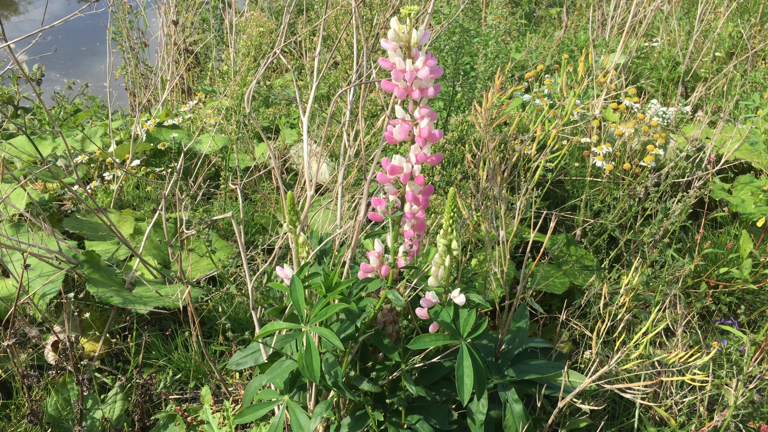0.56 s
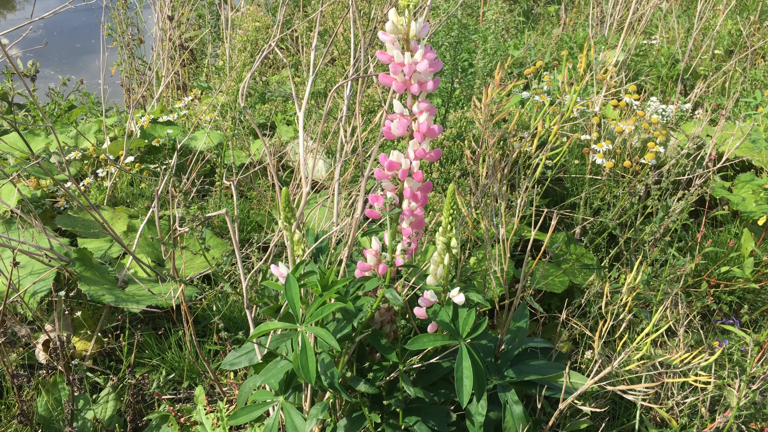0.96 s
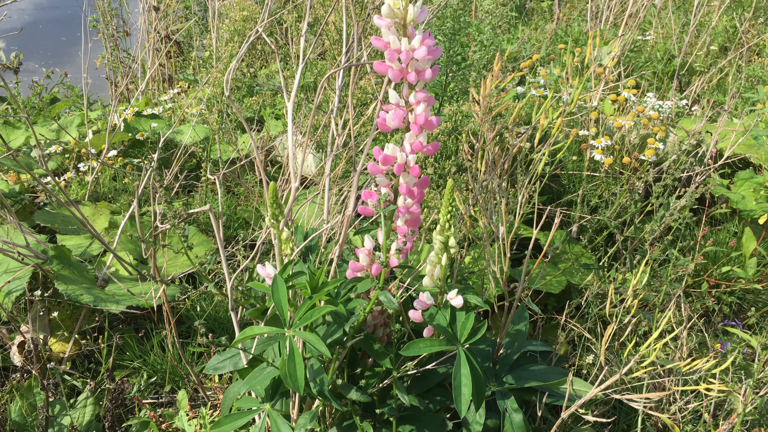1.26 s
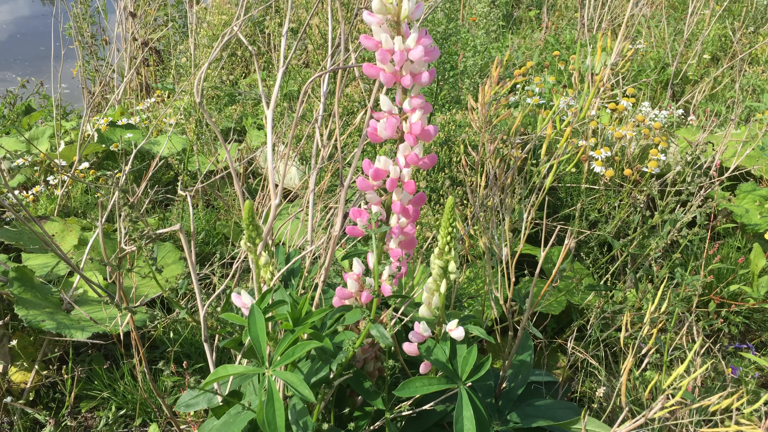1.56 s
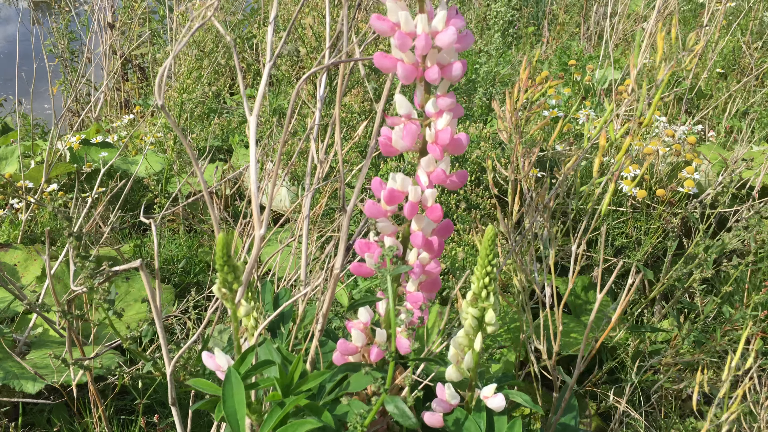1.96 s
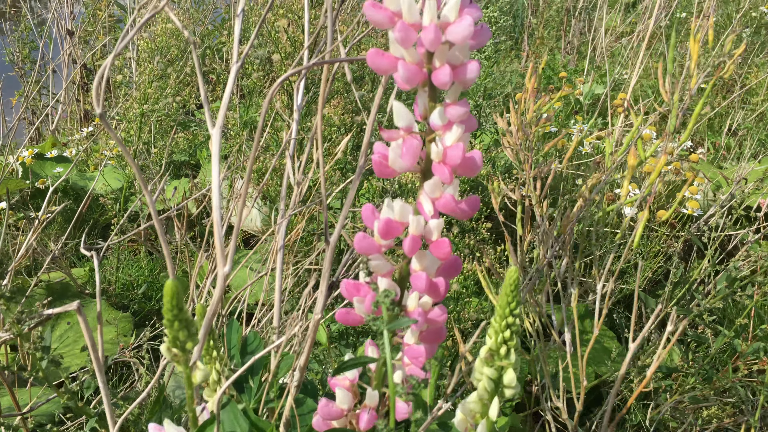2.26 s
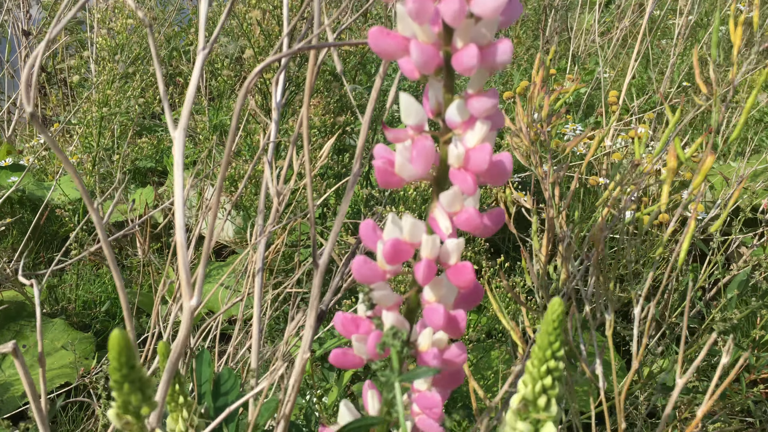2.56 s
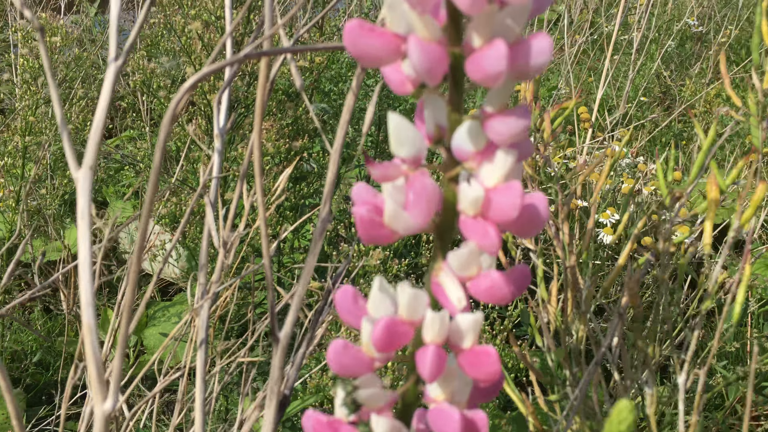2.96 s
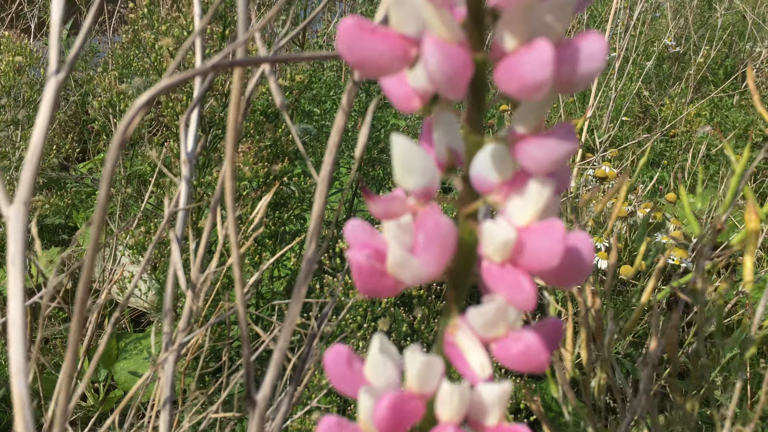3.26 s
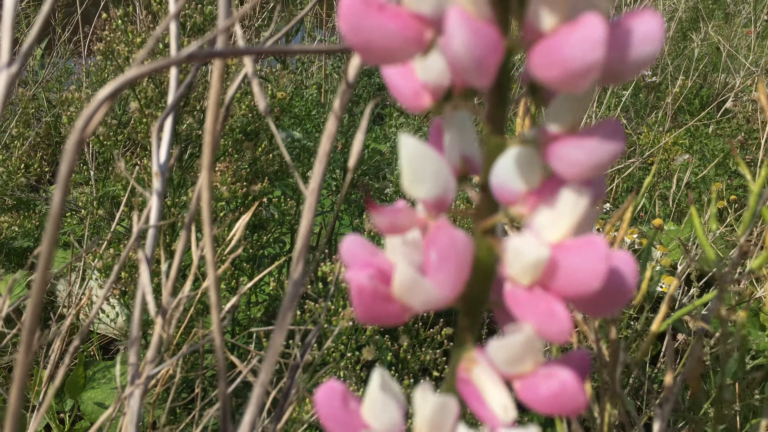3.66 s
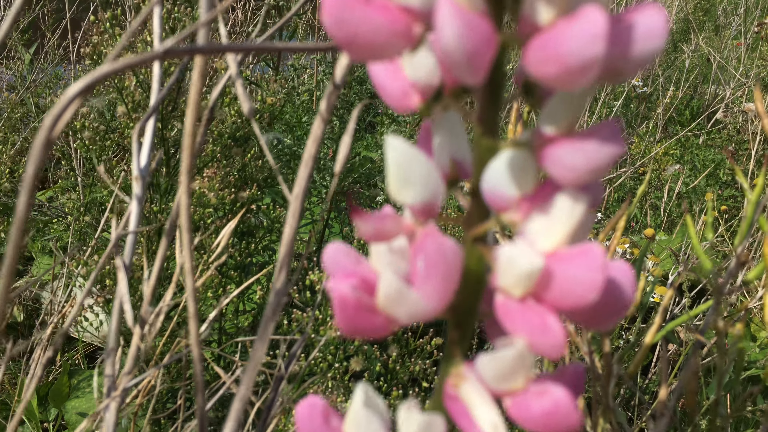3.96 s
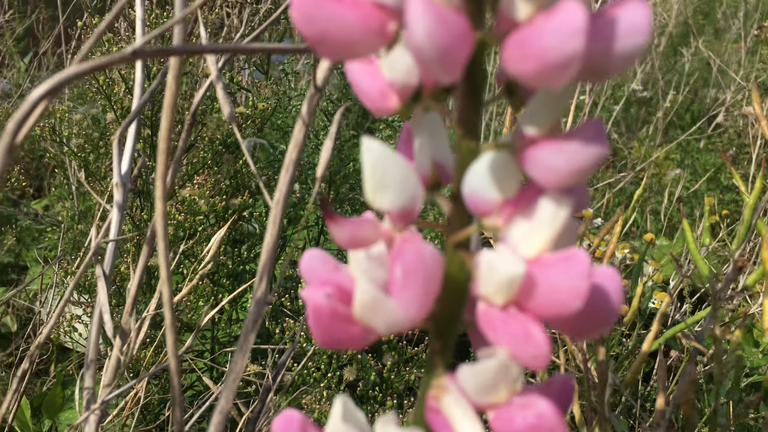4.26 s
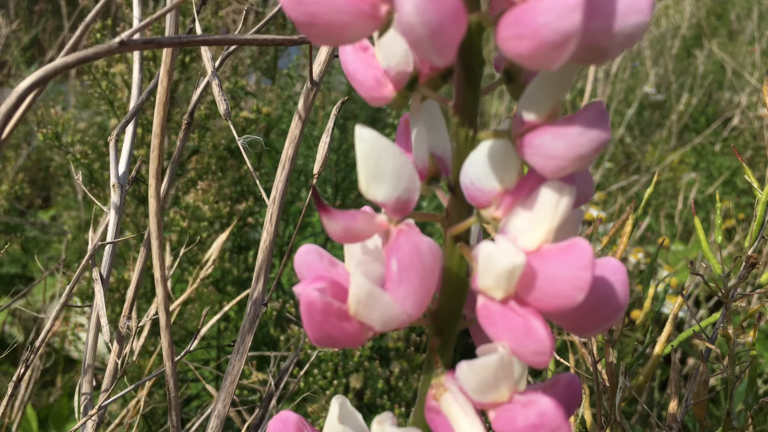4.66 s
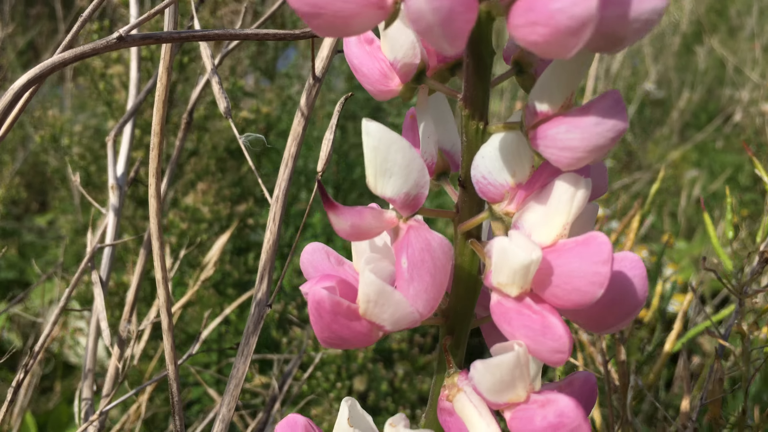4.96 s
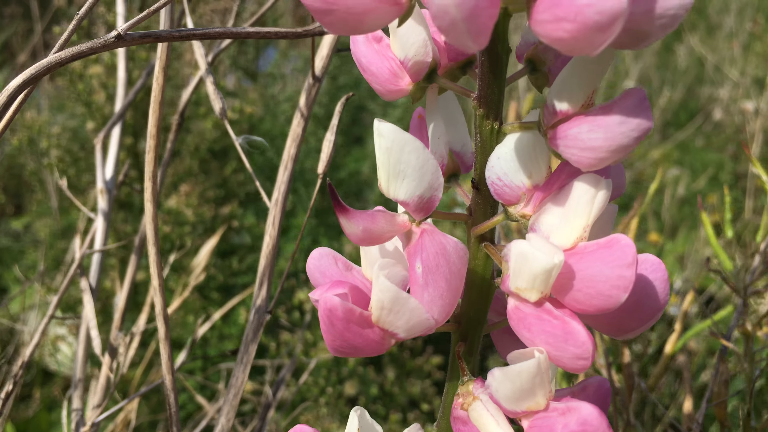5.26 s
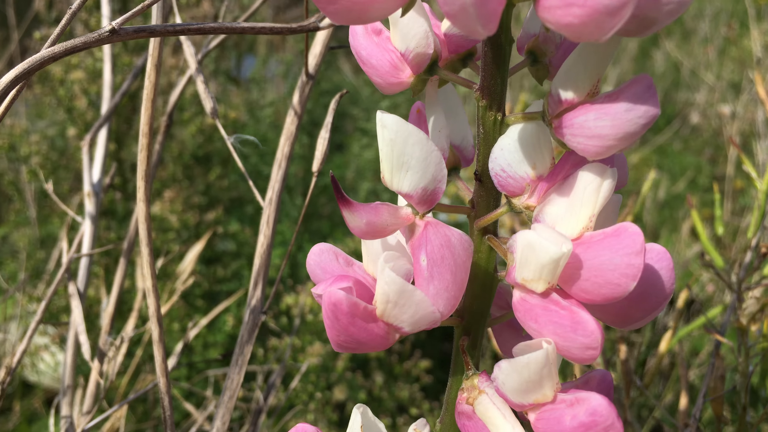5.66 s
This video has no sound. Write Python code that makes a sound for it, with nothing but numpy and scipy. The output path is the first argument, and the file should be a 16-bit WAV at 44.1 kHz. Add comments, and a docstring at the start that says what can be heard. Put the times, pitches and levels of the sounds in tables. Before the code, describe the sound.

Beside tall grass and flowers, in open air, distant motorway traffic runs throughout as a steady, rather dull wash of tyres, slightly flickering in the breeze. Below it, deep engine rumble throbs and surges unevenly, with low drones gliding in and out. From 0 s a nearer vehicle goes by: tyre roar swells to about 0.7 s, with a low howl in waves and a brighter hiss strongest near 1 s. The hiss thins away by about 2.5 s, while the body noise trails off past 3 s. At 1.66 s a very sharp, bright, dry click snaps close to the microphone; a second, less bright one comes at 2.33 s with tiny ticks around it. Sparse faint ticks follow, slightly clearer around 3.3, 4.0, 4.5, 5.3 and 7.0 s. Very faint, fine grass crackle persists. From 3 s to the end at about 8 s, far traffic and pulsing rumble dominate.

```python
"""Motorway traffic from a grass verge: filtered noise makes a steady wash of far tyres throughout, and
noise with gliding sine notes makes a low, throbbing engine rumble under it. From the start one nearer
vehicle goes by in about three seconds: noise bands give tyre roar, body noise, a howl in waves and a
hiss that fades sooner than the body noise. Dry grass crackles faintly all along, as random snaps of
noise. From 1.7 s on, dry ticks of short ringing modes sound close to the microphone, two of them sharp."""
import sys
import numpy as np
from scipy import signal
from scipy.fft import rfft, irfft
from scipy.io import wavfile
from scipy.ndimage import map_coordinates

SR = 44100
rng = np.random.default_rng(int(sys.argv[2]) if len(sys.argv) > 2 else 0)


def persist_wave(psi):
    """Save psi, clipped to +-1, as 16-bit WAV."""
    counts = np.round(np.clip(psi, -1, 1) * 32767).astype(np.int16)
    wavfile.write(sys.argv[1], SR, np.atleast_2d(counts).T)


N = 358091
TIME = np.arange(N) / SR  # s


def gain_of(db):
    """Level and amplitude: 20 dB is a factor of ten in amplitude."""
    return 10 ** (np.asarray(db) / 20)


def evened(x):
    """Normalisation: scales a signal to rms 1."""
    return x / np.sqrt(np.mean(x ** 2) + 1e-20)


def noise(spectrum):
    """Spectral shaping: white noise filtered to (Hz, dB) points, rms 1, silent above the last point."""
    hz, db = np.transpose(spectrum)
    bin_hz = np.fft.rfftfreq(N, 1 / SR)
    shape_db = np.interp(np.log(bin_hz + 1), np.log(hz + 1), db, right=-np.inf)
    white = rng.standard_normal(N)
    return evened(irfft(rfft(white) * gain_of(shape_db), N))


def drift(rate):
    """Low-passed chance: random fluctuation of rms 1, mostly slower than rate (Hz), with zero mean."""
    hz = np.fft.rfftfreq(N, 1 / SR)
    low_pass = (hz > 0) / (1 + (hz / rate) ** 4)
    return evened(irfft(rfft(rng.standard_normal(N)) * low_pass, N))


def curve_over_time(points):
    """Linear interpolation of (s, value) points."""
    return np.interp(TIME, *np.transpose(points))


def level(points):
    """Amplitude envelope: gain over time from (s, dB) points."""
    return gain_of(curve_over_time(points))


def open_air(x, patchy_db, patch_s, patch_hz):
    """Propagation through moving air: patches of the spectrum fade and swell on the way."""
    z = signal.stft(x, nperseg=1024, noverlap=768)[2]
    across = np.fft.fftfreq(z.shape[0], SR / 1024)[:, None]  # cycles per Hz
    along = np.fft.fftfreq(z.shape[1], 256 / SR)  # cycles per s
    blur = np.exp(-(across * patch_hz) ** 2 - (along * patch_s) ** 2)
    chance = rng.standard_normal(z.shape)
    patches = evened(np.fft.ifft2(np.fft.fft2(chance) * blur).real)
    return signal.istft(z * gain_of(patchy_db * patches), nperseg=1024, noverlap=768)[1][:N]


def notched(x, notches):
    """Destructive interference: reflections close to the microphone cancel a few narrow bands."""
    hz = np.fft.rfftfreq(N, 1 / SR)
    loss_db = sum(db / (1 + ((hz - centre_hz) / width) ** 2) for centre_hz, width, db in notches)
    return irfft(rfft(x) * gain_of(loss_db), N)


# Spectrum of far tyres and engines. Each row: frequency in Hz, relative density in dB per Hz.
WASH_SPECTRUM = [(70, 1.5), (115, 9.5), (180, 6.5), (280, 1.44), (350, -0.6), (480, -7), (740, -9.5),
                 (980, -0.64), (1300, -0.2), (2450, -11), (3800, -19.5), (6300, -30.5), (8500, -36),
                 (12500, -41.5), (17000, -45.5)]
# Level of the far traffic. Each row: time in seconds, level in dB.
WASH_LEVEL = [(0, -43.5), (2, -42.5), (3.1, -43), (4.3, -42.5), (5.2, -43), (6.1, -42.4), (7.1, -43.5),
              (8.12, -43)]


def far_traffic():
    """Incoherent sum: many tyres merge into a wash, flickering in the breeze; soft ground dips it near 740 Hz."""
    wash = open_air(noise(WASH_SPECTRUM), patchy_db=0.66, patch_s=0.18, patch_hz=704)
    flicker_db = 0.28 * drift(rate=11)
    return wash * gain_of(flicker_db) * level(WASH_LEVEL)


def note(hz, waver, flutter_db):
    """Periodic firing: a sine of rms 1 with unsteady pitch (waver, share of the note) and level (dB)."""
    turns = np.cumsum(hz * (1 + waver * drift(rate=4.12))) / SR
    flutter = gain_of(flutter_db * drift(rate=6.9))
    return evened(flutter * np.sin(2 * np.pi * turns))


# Exhaust rumble. Each row: frequency in Hz, relative density in dB per Hz.
RUMBLE_SPECTRUM = [(10, -35), (24, -36), (36, -15.5), (48, 2.5), (58, -4), (68, -0.5), (80, 0), (100, -3),
                   (130, -13.5), (170, -28), (400, -50)]
# Level of the rumble. Each row: time in seconds, level in dB.
RUMBLE_LEVEL = [(0.0, -38), (0.35, -38.5), (0.65, -41.5), (1.0, -42), (1.6, -40.5), (2.3, -40.5),
                (3.0, -39), (4.4, -37), (5.1, -39), (5.8, -38.5), (6.4, -43.5), (7.15, -42), (8.12, -39)]
# Firing note of the throbbing engine. Each row: time in seconds, frequency in Hz before its waver.
THROB_NOTE = [(0, 61.5), (0.4, 63), (1, 65), (1.8, 65), (2.2, 65), (2.45, 61), (3.1, 65.5), (3.8, 63),
              (4.3, 64), (4.6, 61), (5.2, 67.5), (6.1, 62), (6.8, 65), (7.7, 62), (8.12, 66)]
# Surges of that engine. Each row: time in seconds, level in dB before its flutter.
THROB_LEVEL = [(0, -38), (0.17, -29.5), (0.42, -41.5), (0.58, -45), (0.8, -44.5), (0.97, -30), (1.18, -47),
               (1.42, -35), (1.7, -35.5), (1.88, -44.5), (2.27, -34.5), (2.62, -44), (2.78, -35),
               (3.1, -32), (3.48, -44), (3.75, -37.5), (4.25, -38), (4.58, -33), (5.05, -41), (5.25, -40),
               (5.95, -42), (6.22, -36), (6.55, -42), (6.82, -35), (7.05, -46), (7.45, -39.5), (7.7, -34.5),
               (8.12, -46)]
# Firing notes of single engines. Each row: start in seconds, end in seconds, first frequency in Hz,
# last frequency in Hz, level in dB before the fade in and out.
DRONES = [(0, 3.8, 130, 138, -47.5), (0.85, 1.92, 45, 43.2, -40.5), (2.6, 3.87, 48, 54.05, -37.5),
          (3.2, 4.4, 116, 121.6, -50.5), (3.4, 5.4, 188.2, 194.8, -56), (3.7, 4.6, 57, 59.4, -42.5),
          (5.1, 6.07, 78, 75.9, -39), (6.2, 6.95, 72, 73.7, -39), (6.1, 7.6, 127, 124.5, -49),
          (6.7, 8.5, 283, 283, -60.5)]


def engines():
    """Tones in noise: exhaust rumble, a deep surging engine, and other notes that glide in and out of earshot."""
    rumble = noise(RUMBLE_SPECTRUM) * level(RUMBLE_LEVEL)
    throb = note(curve_over_time(THROB_NOTE), waver=0.015, flutter_db=2.5)
    out = rumble + throb * level(THROB_LEVEL)
    for start, end, first_hz, last_hz, db in DRONES:
        along = np.clip((TIME - start) / (end - start), 0, 1)
        in_earshot = np.sqrt(np.sin(np.pi * along).clip(0))
        glide_hz = first_hz + (last_hz - first_hz) * along
        out += gain_of(db) * in_earshot * note(glide_hz, waver=0.005, flutter_db=2.5)
    return out


def gliding(x, curve):
    """Resampling: reading a sound faster or slower shifts its pitch by (s, factor) points."""
    read_at = np.cumsum(curve_over_time(curve))
    return map_coordinates(x, [read_at], order=3, mode="wrap")


GRASS_LOSS_DB = 5  # for each further closest-approach distance


def passing(abreast_s, db, approach_s, retreat_s):
    """Spherical spreading and ground loss: gain falls with distance and with the grass crossed."""
    along = (TIME - abreast_s) / np.where(TIME < abreast_s, approach_s, retreat_s)
    distance = np.hypot(1, along)  # in closest-approach distances
    return gain_of(db - GRASS_LOSS_DB * (distance - 1)) / distance


# Tyre roar. Each row: frequency in Hz, relative density in dB per Hz.
ROAR_SPECTRUM = [(300, -50), (500, -22), (660, -8.5), (780, -8), (900, -1), (1130, 3), (1320, -1.5),
                 (1500, -6.5), (1750, -17), (2100, -11), (2600, -40), (6000, -43)]
# Its pitch rises a little as the vehicle draws level, then sinks. Each row: time in seconds, pitch factor.
ROAR_GLIDE = [(0, 0.97), (0.9, 1.016), (2, 0.99)]
# Its pass. The one row: loudest moment in seconds, level in dB, approach in seconds, retreat in seconds.
ROAR_PASS = (0.7, -42, 4, 0.9)
# Low howl of the tread. Each row: frequency in Hz, relative density in dB per Hz, before the glide.
HOWL_SPECTRUM = [(380, -32), (520, -3), (650, 1), (760, -3), (900, -1.5), (1400, -33)]
# Its pitch wanders as the path over the ground changes. Each row: time in seconds, pitch factor.
HOWL_GLIDE = [(0, 1.06), (0.7, 0.96), (1.25, 0.94), (1.65, 1.05), (2.1, 0.99), (2.7, 1.1)]
# Its waves of loudness. Each row: time in seconds, level in dB.
HOWL_LEVEL = [(0, -48), (0.2, -49), (0.55, -59), (0.95, -59), (1.22, -52.5), (1.45, -59), (1.68, -54),
              (1.95, -54.5), (2.35, -54), (2.8, -54.5), (3.4, -66), (5, -87)]
# Body noise. Each row: frequency in Hz, relative density in dB per Hz.
BODY_SPECTRUM = [(50, -14), (120, -2.5), (170, -3), (230, 2), (290, -3.5), (340, -3.5), (420, -14.5),
                 (650, -15), (1500, -24), (4000, -55)]
# Level of the body noise. Each row: time in seconds, level in dB.
BODY_LEVEL = [(0, -49), (0.35, -49), (0.75, -41.5), (1.15, -44), (1.6, -42.5), (2.1, -45), (2.8, -48),
              (3.6, -53), (4.6, -59), (8.12, -72)]
# Hiss. Each row: frequency in Hz, relative density in dB per Hz.
HISS_SPECTRUM = [(700, -18), (1400, 4), (1800, 13.5), (2250, 7), (2650, -5), (3200, 2), (3800, -1.5),
                 (4600, -3.5), (6000, -5), (7500, -11), (9200, -12.5), (11500, -16), (13200, -17),
                 (14500, -24), (17000, -28)]
# Level of the hiss. Each row: time in seconds, level in dB.
HISS_LEVEL = [(0, -57), (0.24, -58.5), (0.42, -53), (0.8, -53), (1.07, -50.5), (1.27, -55.5), (1.9, -56.5),
              (2.25, -62), (3, -74), (5, -88)]


def near_vehicle():
    """Superposition: tyre roar thrown forwards, body noise that trails behind, hiss, and a howl in waves."""
    roar = gliding(noise(ROAR_SPECTRUM), ROAR_GLIDE) * passing(*ROAR_PASS)
    howl = gliding(noise(HOWL_SPECTRUM), HOWL_GLIDE) * level(HOWL_LEVEL)
    body = noise(BODY_SPECTRUM) * level(BODY_LEVEL)
    hiss = noise(HISS_SPECTRUM) * level(HISS_LEVEL)
    return open_air(roar + howl + body + hiss, patchy_db=1.58, patch_s=0.075, patch_hz=500)


CRACKLE_PER_S, CRACKLE_DB, CRACKLE_SPREAD_DB = 120, -81, 2.1  # mean rate, rms level, spread of sizes
# Rustle, shared by the grass and the ticks. Each row: frequency in Hz, relative density in dB per Hz.
RUSTLE_SPECTRUM = [(2000, -40), (5000, 1), (7000, -4), (9000, -3), (13000, -1), (15000, -5), (17000, -12)]


def grass():
    """Random impulses: dry stalks brush together in tiny snaps, each a decaying burst of noise."""
    size_db = CRACKLE_SPREAD_DB * np.minimum(rng.exponential(1, N), 3)
    snaps = gain_of(size_db) * (rng.random(N) < CRACKLE_PER_S / SR)
    decay = np.exp(-1 / (0.0011 * SR))  # time constant 1.1 ms
    bursts = signal.lfilter([1], [1, -decay], snaps)
    return gain_of(CRACKLE_DB) * evened(bursts * noise(RUSTLE_SPECTRUM))


def add(mix, s, sound):
    """Superposition: mixes a sound in at time s."""
    part = mix[round(s * SR):][:len(sound)]
    part += sound[:len(part)]


CRACK_T60_S, RUSTLE_T60_S = 0.004, 0.051
# Dry ticks. Each row: start in seconds, ring peak in dB, pitch factor, treble tilt in dB per octave,
# crack level in dB, rustle level in dB.
TICKS = [(1.6572, -11.5, 0.99, 4, -31, -51), (2.2410, -57, 1.25, 0, -64, -60.5),
         (2.3277, -47, 0.78, -12, -49, -66), (2.3295, -19, 1, -14, -36, -54),
         (2.4258, -53, 1.25, -2, -64, -69), (2.554, -59, 1.2, -4, -67, -63),
         (3.0038, -61, 1.1, 0, -72, -71), (3.178, -62, 1.15, 0, -74, -67), (3.1900, -62, 1.3, 0, -74, -66),
         (3.3248, -55, 1.18, -1, -62, -61), (4.026, -50, 1.1, -3, -56, -64),
         (4.4342, -59, 1.3, 0, -72, -68), (4.4706, -51, 0.92, -8, -59, -63),
         (5.3127, -52, 1.3, 1, -64, -59.5), (6.4180, -62, 1.35, 2, -74, -66),
         (6.4320, -61, 1.35, 2, -74, -65), (6.9570, -55, 1.2, -2, -66, -64)]
# Modes of a tick. Each row: frequency in Hz before the pitch factor, relative level in dB, t60 in seconds.
TICK_MODES = [(5600, -28, 0.004), (6770, 2, 0.003), (8400, 1.5, 0.003), (9700, -0.5, 0.003),
              (12100, -5, 0.0021), (15650, -6, .0036)]
# Crack that starts a tick. Each row: frequency in Hz, relative density in dB per Hz.
CRACK_SPECTRUM = [(600, -12), (1300, 3), (3600, 3), (5000, -3), (9000, -2), (14000, -1), (17000, -9)]


def ticks():
    """Modal impact: a broad crack rings very short modes, scatters off what stands near and ends in a rustle."""
    t, out = np.arange(4096) / SR, np.zeros(N)
    bin_hz = np.fft.rfftfreq(len(t), 1 / SR)
    octaves = np.log2(np.clip(bin_hz, 6800, None) / 8000)  # from 8 kHz; no further tilt below 6.8 kHz
    small_body = signal.butter(2, [4500, 17500], "band", fs=SR, output="sos")
    crack_level, rustle_level = np.zeros(N), np.zeros(N)
    for s, db, pitch, tilt_db, crack_db, rustle_db in TICKS:
        ring = np.zeros(len(t))
        for k, (hz, mode_db, t60) in enumerate(TICK_MODES):
            # neighbouring modes start in opposite directions, which fills the valleys between them
            direction = (-1) ** k
            ring += direction * gain_of(mode_db - 60 * t / t60) * np.sin(2 * np.pi * pitch * hz * t)
        # so small a thing radiates little bass
        ring = signal.sosfilt(small_body, ring)
        scatter = rng.standard_normal(len(t)) * gain_of(-29.5 - 60 * t / 0.018)
        snap = irfft(rfft(ring) * (1 + rfft(scatter)) * gain_of(tilt_db * octaves))[:len(t) // 2]
        add(out, s, gain_of(db) * snap / abs(snap).max())
        add(crack_level, s, gain_of(crack_db - 60 * t / CRACK_T60_S))
        add(rustle_level, s, gain_of(rustle_db - 60 * t / RUSTLE_T60_S))
    return out + crack_level * noise(CRACK_SPECTRUM) + rustle_level * noise(RUSTLE_SPECTRUM)


# Cancelled bands of the road noise. Each row: centre in Hz, half-width in Hz, gain in dB.
ROAD_NOTCHES = [(2860, 134, -3.5), (4940, 230, -4), (7750, 490, -3.5), (10400, 310, -5)]
# Cancelled bands of the ticks and grass. Each row: centre in Hz, half-width in Hz, gain in dB.
CLOSE_NOTCHES = [(4900, 260, -3), (10890, 230, -9), (14100, 400, -3)]


def scene():
    """Superposition at one microphone: the road, the grass and the close ticks."""
    road = notched(far_traffic() + engines() + near_vehicle(), ROAD_NOTCHES)
    close = notched(grass() + ticks(), CLOSE_NOTCHES)
    return (road + close)[None]


def record(dry):
    """Band limiting: the recorder passes only what lies below its upper edge."""
    low_pass = signal.firwin(511, 19300, window=("kaiser", 9), fs=SR)  # edge in Hz
    return signal.oaconvolve(dry, low_pass[None], "same")


dry = scene()
out = record(dry)
persist_wave(out)
```